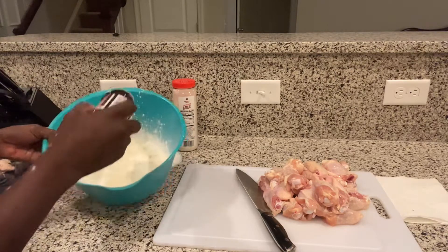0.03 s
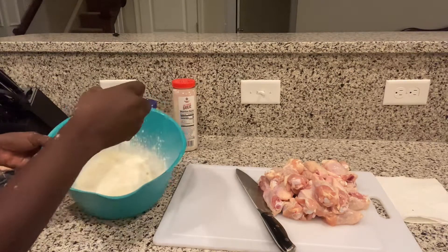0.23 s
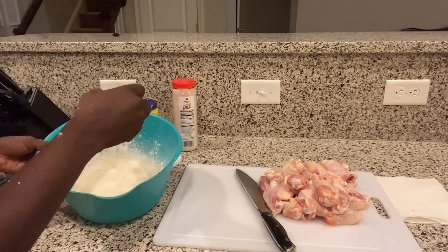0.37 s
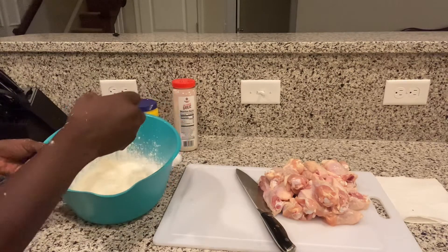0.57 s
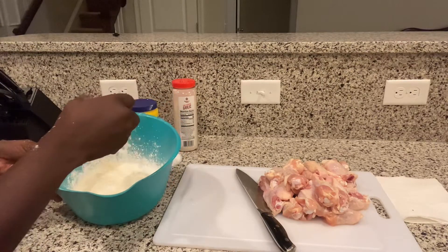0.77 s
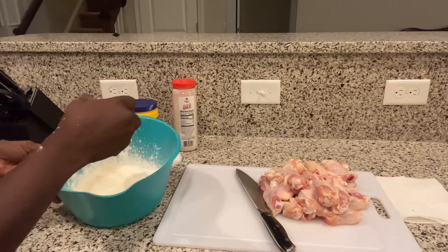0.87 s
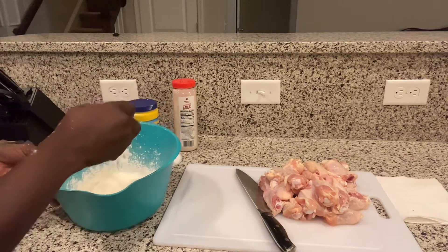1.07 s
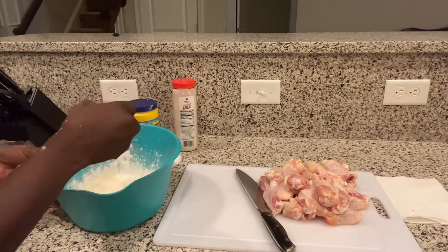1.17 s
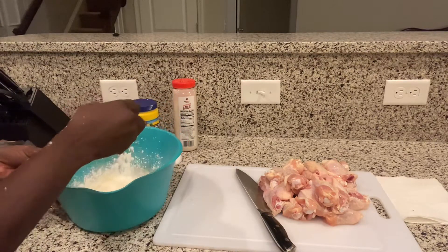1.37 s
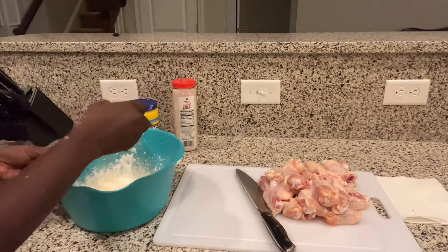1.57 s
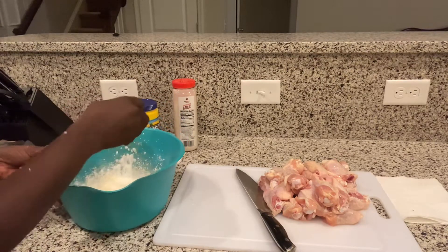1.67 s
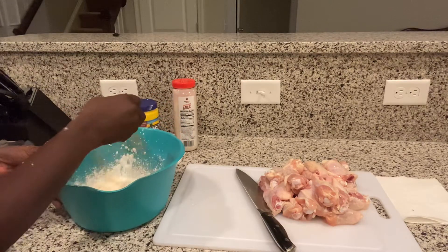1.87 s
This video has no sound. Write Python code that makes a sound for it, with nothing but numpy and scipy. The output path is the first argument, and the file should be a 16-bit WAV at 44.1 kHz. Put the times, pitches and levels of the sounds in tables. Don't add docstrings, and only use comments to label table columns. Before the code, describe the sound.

A plastic bowl scrapes briefly and lands on a stone counter with one hollow knock, rocking to rest; then faint granular shakes of seasoning with tiny ticks, close stereo microphone in a small humming kitchen.

```python
import sys
import numpy as np
from scipy import signal
from scipy.fft import rfft, irfft
from scipy.io import wavfile
from scipy.ndimage import uniform_filter1d

SR = 44100
rng = np.random.default_rng(int(sys.argv[2]) if len(sys.argv) > 2 else 0)


def transcribe(signal):
    frames = np.atleast_2d(signal).T
    limited = np.clip(frames, -1, 1)
    pcm = np.round(limited * 32767).astype(np.int16)
    wavfile.write(sys.argv[1], SR, pcm)


def boost(x):
    u = np.asarray(x, float) / 20
    return 10 ** u


N = 83790

# frequency [Hz], density [dB per Hz].
AIR_COLOUR = [(25, -42), (55, -14), (120, -5.5), (200, -4.5), (240, -10.5), (375, -7.5), (480, -18.5),
              (1000, -26.5), (2000, -58)]
# frequency [Hz], density [dB per Hz].
HISS_COLOUR = [(400, -22), (700, -19), (1200, -4), (1900, -18), (2900, -18), (4400, -18), (7000, -16),
               (14500, -31)]
# frequency [Hz], likeness [0-1].
AIR_LIKENESS = [(60, 1), (130, 0.81), (290, 0.95), (630, 0.89), (1370, 0.34), (2990, 0.19), (6530, 0.033),
                (14300, 0.13)]
# frequency [Hz], level [dB], waver [dB], left over right [dB].
COMPRESSOR_TONES = [(140.4, -52.5, 2.13, 1)]
# time [s], level [dB].
OVERTONE_LEVEL = [(0.0, -55), (0.074, -80), (0.12, -66), (0.164, -40), (0.29, -87), (0.344, -52.5),
                  (.45, -55), (0.592, -77), (0.624, -53.5), (.8, -57.5), (.97, -54.5), (1.1, -56.5),
                  (1.248, -45), (1.38, -53), (1.486, -64.5), (1.582, -53), (1.8, -64), (1.862, -55)]
# frequency [Hz], time to fall 60 dB [s].
KITCHEN_DECAY = [(60, 0.95), (150, 0.49), (375, 0.57), (900, 0.58), (1650, 0.65), (3000, 0.59),
                 (6000, 0.58), (12000, 0.18)]
# frequency [Hz], gain [dB].
KITCHEN_COLOUR = [(60, 21), (150, 6.5), (375, -4), (800, 4), (1650, -6), (3000, -1), (6000, -7.5),
                  (12000, 1)]
# start [s], length [s], level [dB], dullness [0-1].
STROKES = [(0.07, 0.15, -66, 0.6), (0.121, 0.15, -64.5, 1), (0.265, 0.081, -66, 0.95),
           (0.596, 0.044, -76.5, 0.05), (0.686, 0.082, -70.5, 0.43), (0.747, 0.072, -69, 0.92),
           (0.83, 0.072, -68, 0.73), (0.897, 0.051, -62, 0.56), (0.96, 0.057, -61.5, 0.9),
           (1.013, 0.062, -67, 0.75), (1.115, 0.057, -71.5, 0.26), (1.187, 0.058, -71.5, 0.26),
           (1.255, 0.06, -74, 0), (1.319, 0.078, -74, 0.3), (1.397, 0.063, -74.5, 0.54),
           (1.467, 0.064, -74.5, 0.9), (1.544, 0.046, -71.5, 0.26), (1.588, 0.088, -73, 0.01),
           (1.702, 0.11, -71, 0.52), (1.822, 0.094, -70, 0.56)]
# frequency [Hz], density [dB per Hz].
BRIGHT_COLOUR = [(500, -29.5), (1500, -19.5), (2800, -7.5), (4200, -7.5), (6500, -2.5), (8000, -4.5),
                 (11000, -10), (14500, -17)]
# frequency [Hz], density [dB per Hz].
DULL_COLOUR = [(400, -29), (900, -8), (1500, 11), (2200, -7), (2900, -17), (4500, -10.5), (8000, -13),
               (14500, -25.5)]
# frequency [Hz], width [Hz], gain [dB].
SHAKER_MODES = [(1550, 260, -10.5), (2075, 75, 9.5), (2550, 110, -5.5), (3420, 200, 7), (4235, 370, 7),
                (6350, 410, 6.5), (7440, 188, 5.5)]
TICK_STARTS = [.1655, .7035, .7713, .8342, .865, .9027, .9062, .9225, .932, .968, .9752, .986, .989, .995,
               1.032, 1.119, 1.376, 1.5406, 1.6034, 1.6917, 1.735, 1.8284, 1.856]
# level [dB], low part [dB].
TICK_LEVELS = [(-51, -15.5), (-71, -4), (-68, -8), (-74, -6), (-59.5, 5), (-55, -9), (-43, -8), (-57, -11),
               (-53, -10), (-58, -12), (-56, -13), (-47, -6.5), (-57.5, 6), (-56, -10), (-61.5, 3),
               (-74, -7), (-63, 1.5), (-66, -8), (-65, -16), (-74, -12), (-67, -10), (-70, -11), (-64, -12)]
# frequency [Hz], density [dB per Hz].
SNAP_COLOUR = [(1500, -39), (2850, -29), (3400, -4), (4500, -2), (6500, 4.5), (9000, 2.5), (12000, -17),
               (14500, -14.5)]
# frequency [Hz], width [Hz], level [dB].
DRAG_MODES = [(926, 192, -75), (2050, 330, -74.5), (3570, 133, -74.5), (4250, 390, -79)]
# time [s], mode frequency [Hz], level [dB].
ROCKING = [(0.129, 349, -35.5), (0.14, 343, -35), (0.144, 2480, -54), (.151, 407, -46), (.153, 2050, -47),
           (0.167, 1295, -50), (.172, 337, -42), (.182, 1700, -57), (.186, 496, -38.5), (0.203, 170, -37),
           (0.205, 384, -44), (0.221, 1600, -71), (0.243, 1480, -67), (0.259, 492, -49.5),
           (0.278, 1650, -59), (0.297, 1696, -56.5)]
# frequency [Hz], level [dB], time to peak [s], sag of pitch [per s].
BOWL_MODES = [(170.6, -15, 0.0065, 1.4), (641, 2.5, 0.0048, 76), (792, -18, 0.0055, 0.69),
              (846, -12.5, 0.0032, 1.1), (1292, -19.5, 0.0032, 1.3), (1628, -10, 0.0035, 0.37),
              (1930, -23.5, .004, 0.98), (2120, -21.5, 0.0051, 1.1), (2294, -26, 0.0067, 0.87),
              (2425, -20.5, 0.0028, 0.37)]
# frequency [Hz], level [dB].
RIM_MODES = [(2900, -35), (3330, -33.5), (3610, -40), (4110, -36), (5020, -41), (5640, -42.5), (6590, -41),
             (7840, -56)]
# frequency [Hz], density [dB per Hz].
CRACK_COLOUR = [(2750, -39), (3250, -9), (5500, 12.5), (8500, -9), (10400, 9), (12000, -10.5), (16000, -5)]
# frequency [Hz], left over right [dB].
KNOCK_SIDE = [(60, -7), (200, 6), (400, -6), (800, 8), (1600, -2.5), (4000, 2), (8000, -14), (14000, -3)]
# frequency [Hz], gain [dB].
MIC_RESPONSE = [(28, -11), (50, 0.5), (9400, -3), (9800, -30.5), (10900, -28), (11400, -5), (13600, -5),
                (15000, -19)]

AIR_LAG_S = -0.00054
GRAIN_SHARED = .6


def evened(x):
    return x / np.sqrt(np.mean(x ** 2) + 1e-20)


def read(points, hz):
    f, value = np.transpose(points)
    return np.interp(np.log(hz + 1), np.log(f + 1), value)


def shaped(x, gain):
    spectrum = rfft(x, 2 * N) * gain(np.fft.rfftfreq(2 * N, 1 / SR))
    return irfft(spectrum, 2 * N)[..., :N]


def resonance(f, hz, width):
    return 1 / (1 + ((f - hz) / width) ** 2)


def slow(t, top_hz):
    rates = np.geomspace(.4, top_hz, num=20)
    return evened(sum(np.sin(2 * np.pi * (f * t + rng.random())) / np.sqrt(f) for f in rates))


def clumped(x, db):
    z = signal.stft(x, nperseg=256)[2]
    patches = uniform_filter1d(rng.standard_normal(z.shape[1:]), size=4, axis=0)
    patches = uniform_filter1d(patches, size=7, axis=1)
    return signal.istft(z * boost(db * evened(patches)), nperseg=256)[1][:, :N]


def paired(z, a, hz):
    same = np.clip(read(AIR_LIKENESS, hz), 0, 1)[:, None]
    lag = np.exp(-2j * np.pi * hz * AIR_LAG_S)[:, None]
    return np.array([same * z * lag + np.sqrt(1 - same ** 2) * a, z])


def room_air(colour, db, patchy_db):
    frames, hz = N // 256 + 5, np.fft.rfftfreq(1024, 1 / SR)
    a, b, c, d, patches = rng.standard_normal((frames, 513, 5)).T
    patches = uniform_filter1d(patches, size=10, axis=0)
    patches = evened(uniform_filter1d(patches, size=12, axis=1))
    level = boost(read(colour, hz)[:, None] + patchy_db * patches)
    z = paired(a + 1j * b, c + 1j * d, hz) * level
    return boost(db) * evened(signal.istft(z, nperseg=1024, noverlap=768)[1][:, :N])


def fridge():
    overtone_hz, overtone_waver_db = 276, 1.5
    whine_hz, whine_width_hz, whine_db, whine_core = 3485, 70, -90, .9
    t = np.arange(N) / SR
    out = np.zeros((2, N))
    for hz, db, waver_db, pan_db in COMPRESSOR_TONES:
        level = np.sqrt(2) * boost(db + waver_db * slow(t, 16))
        tone = level * np.sin(2 * np.pi * (hz * t + 0.11 * slow(t, 2.3) + rng.random()))
        out += tone * boost(np.array([[pan_db], [-pan_db]]) / 2)

    overtone_db = np.interp(t, *np.transpose(OVERTONE_LEVEL)) + overtone_waver_db * slow(t, 40)
    arrival = t - np.array([[AIR_LAG_S], [0]])
    out += np.sqrt(2) * boost(overtone_db) * np.sin(2 * np.pi * overtone_hz * arrival)

    fuzz = shaped(rng.standard_normal((2, N)), lambda f: resonance(f, whine_hz, whine_width_hz) ** 2)
    core = whine_core * np.sin(2 * np.pi * whine_hz * t + slow(t, 25))
    return out + boost(whine_db + 1.9 * slow(t, 60)) * (evened(fuzz) + core)


def kitchen(x):
    taps = np.zeros((2, SR))
    at = np.arange(300, SR - 20, 20) + rng.integers(0, 20, (2, (SR - 301) // 20))
    np.put_along_axis(taps, at, rng.choice([-1., 1.], at.shape), 1)
    hz, t, z = signal.stft(taps, SR, nperseg=512)
    decay = boost(-60 * t / read(KITCHEN_DECAY, hz)[:, None])
    tail = signal.istft(paired(*z, hz) * decay, SR, nperseg=512)[1]
    return signal.fftconvolve(x, tail / np.linalg.norm(tail[0]), axes=1)[:, :N]


def shaker(f):
    return boost(sum(db * resonance(f, hz, width) for hz, width, db in SHAKER_MODES))


def strokes():
    grains_per_s, spread_db, spread_cap = 5000, 2.6, 2.6
    rise, flatness = .6, .7
    t = np.arange(N) / SR
    weight = boost(spread_db * np.minimum(rng.exponential(1, (2, N)), spread_cap))
    falls = rng.random((2, N)) < grains_per_s / SR
    grains = weight * falls * rng.choice([-1., 1.], (2, N))
    grains = clumped(grains + GRAIN_SHARED * grains[::-1], 1.8)
    bright = evened(shaped(grains, lambda f: shaker(f) * boost(read(BRIGHT_COLOUR, f))))
    dull = evened(shaped(grains, lambda f: shaker(f) * boost(read(DULL_COLOUR, f))))

    out = np.zeros((2, N))
    for start, length, db, dullness in STROKES:
        mix = np.clip(dullness, 0, 1)
        progress = np.clip((t - start) / length, 0, 1)
        swell = np.sin(np.pi * progress ** rise).clip(0) ** flatness
        out += boost(db) * swell * ((1 - mix) * bright + mix * dull)
    return out


def shaker_ticks():
    snap_s, low_hz, edge_gain = .0014, 1500, .8
    t = np.arange(N) / SR
    noise = rng.standard_normal((2, N))
    high = evened(shaped(noise + GRAIN_SHARED * noise[::-1], lambda f: boost(read(SNAP_COLOUR, f))))
    ticks = np.zeros((2, N))
    for start, (db, low_db) in zip(TICK_STARTS, TICK_LEVELS):
        u = np.maximum(t - start, 0)
        snap = (t > start) * np.exp(-u / snap_s) * high
        snap = snap / abs(snap).max()
        body = boost(-1) * np.exp(-u / 0.0036) * np.sin(2 * np.pi * 520 * u)
        low = boost(low_db) * np.exp(-u / 0.002) * np.sin(2 * np.pi * low_hz * u)
        ticks += boost(db) * (t > start) * (snap + body + low)

    edges = np.zeros(N)
    at = np.round(np.array(TICK_STARTS) * SR).astype(int) + 8
    edges[at] = boost(np.array(TICK_LEVELS)[:, 0])
    loudest_db = np.max(SNAP_COLOUR, 0)[1]
    return ticks + edge_gain * shaped(edges, lambda f: boost(read(SNAP_COLOUR, f) - loudest_db))


def seasoning():
    falling, ticks = strokes(), shaker_ticks()
    return falling + ticks + kitchen(boost(-7) * falling + boost(-8) * ticks)


def drag():
    fade_s = 0.079
    t = np.arange(N) / SR
    noise = rng.standard_normal((2, N))
    scrape = sum(boost(db) * evened(shaped(noise, lambda f: resonance(f, hz, width)))
                 for hz, width, db in DRAG_MODES)
    return scrape * np.clip(1.3 - t / fade_s, 0, 1)


def rattles():
    t = np.arange(N) / SR
    out = np.zeros(N)
    for start, hz, db in ROCKING:
        cycles = np.minimum(5.5, hz * 0.007)
        u = np.maximum(t - start, 0) * hz / cycles
        out += boost(db) * u * np.exp(1 - u) * np.sin(2 * np.pi * hz * (t - start))
    return out


def knock():
    knock_s, knock_db, kitchen_db = .1133, -14.5, -7.5
    crack_db, crack_s, crack_late_s, rim_s = -37.5, 0.0043, .0008, 0.0035
    lag_s = -0.000068
    t = np.maximum(np.arange(N) / SR - knock_s, 0)
    body = np.zeros(N)
    for hz, db, peak_s, sag in BOWL_MODES:
        swell = (t / peak_s * np.exp(1 - t / peak_s)) ** 3.0
        body += boost(db) * swell * np.cos(2 * np.pi * hz * (1 - np.exp(-sag * t)) / sag)
    body = shaped(body * boost(knock_db), lambda f: boost(-18 * resonance(f, 660, 50)))

    crack = evened(shaped(rng.standard_normal(N), lambda f: boost(read(CRACK_COLOUR, f)) * (f > 2000)))
    crack = boost(crack_db) * crack * (t > crack_late_s) * np.exp(-t / crack_s)
    u = np.maximum(t - crack_late_s, 0)
    rim = sum(boost(db) * np.sin(2 * np.pi * hz * u) for hz, db in RIM_MODES) * np.exp(-u / rim_s)

    side = np.array([[.5], [-.5]])

    def placed(f):
        lag = np.exp(-2j * np.pi * np.minimum(f, 3500) * side * lag_s)
        return boost(side * read(KNOCK_SIDE, f)) * lag

    direct = shaped(body + crack + rim, placed)
    sent = body + boost(6) * crack + boost(-3.5) * rim
    sent = shaped(sent, lambda f: boost(read(KITCHEN_COLOUR, f)))
    return direct + boost(kitchen_db) * clumped(kitchen(sent[None]), 1.5)


def scene():
    air = room_air(AIR_COLOUR, -51.5, patchy_db=1.5)
    hiss = room_air(HISS_COLOUR, -74.5, patchy_db=5.0)
    return air + hiss + fridge() + seasoning() + drag() + rattles() + knock()


def low_pass(x):
    return signal.sosfilt(signal.butter(12, 14870, fs=SR, output="sos"), x)


def record(dry):
    mix = shaped(dry, lambda f: boost(read(MIC_RESPONSE, f)))
    return low_pass(mix)


dry = scene()
out = record(dry)
transcribe(out)
```